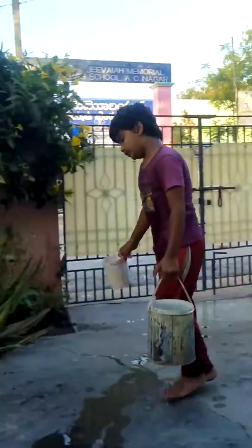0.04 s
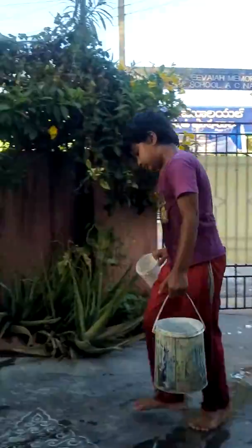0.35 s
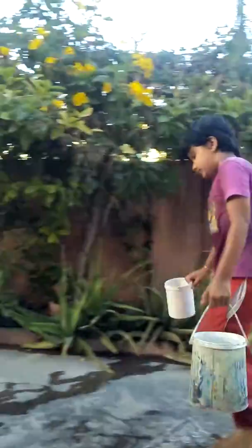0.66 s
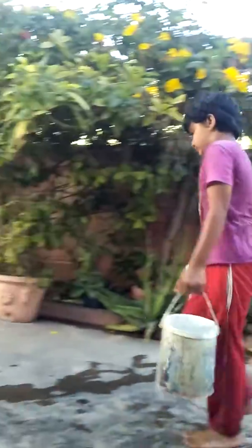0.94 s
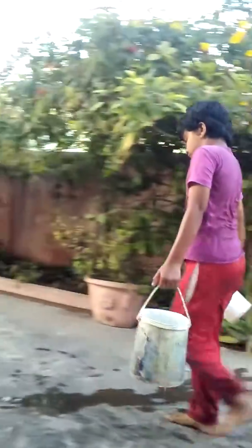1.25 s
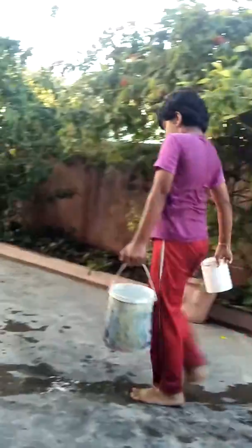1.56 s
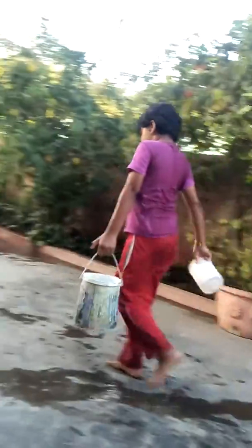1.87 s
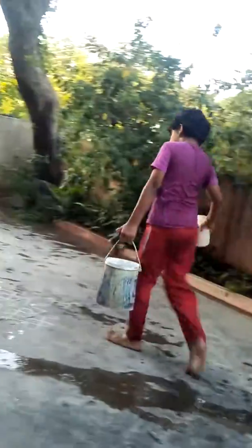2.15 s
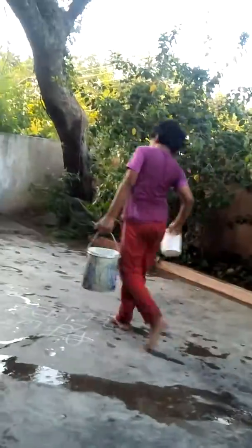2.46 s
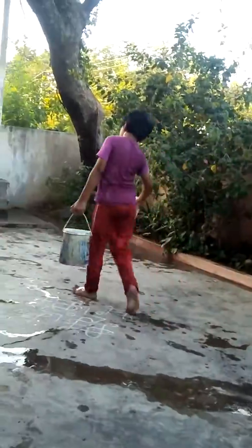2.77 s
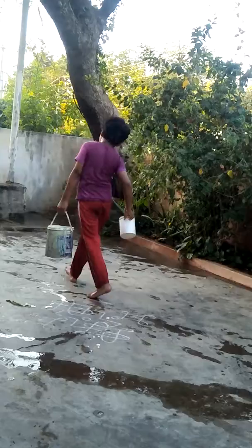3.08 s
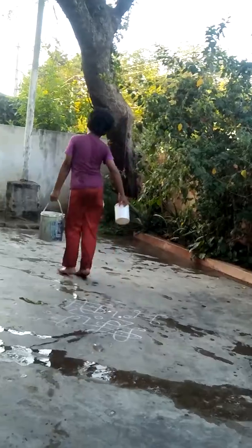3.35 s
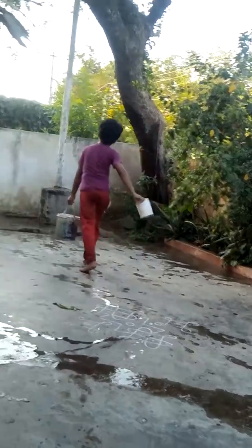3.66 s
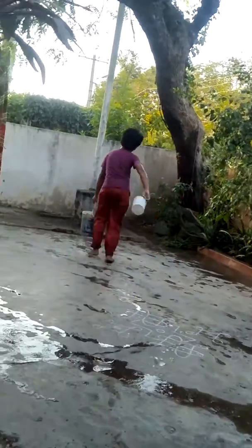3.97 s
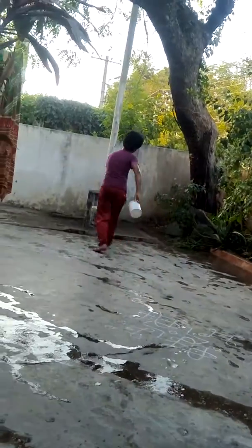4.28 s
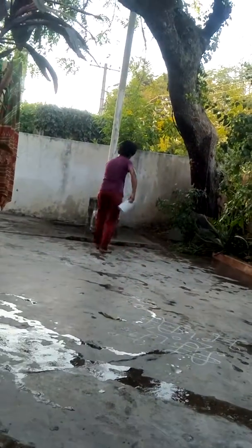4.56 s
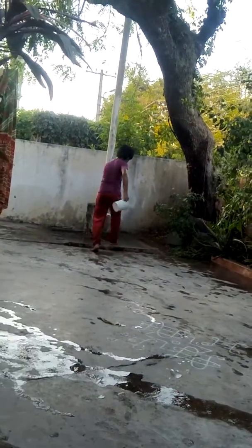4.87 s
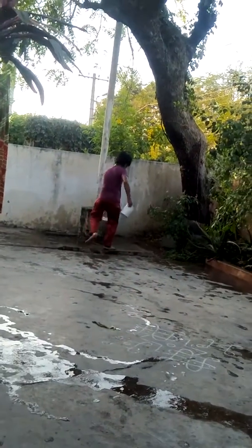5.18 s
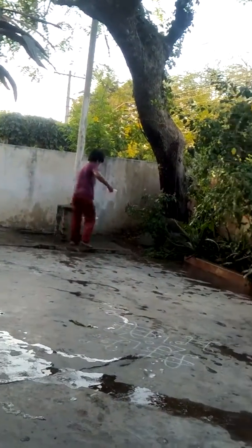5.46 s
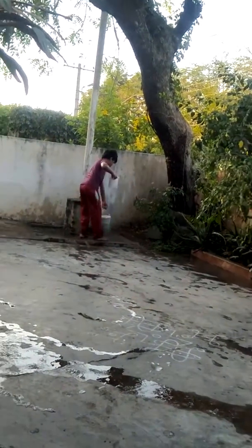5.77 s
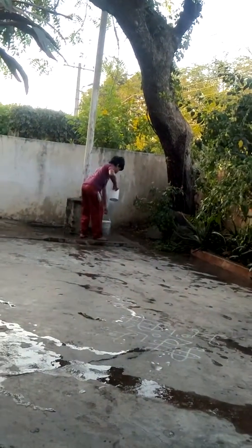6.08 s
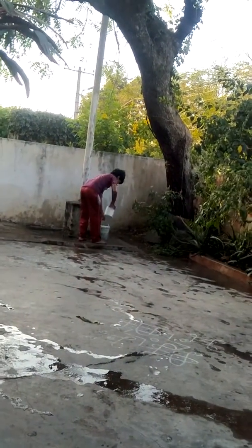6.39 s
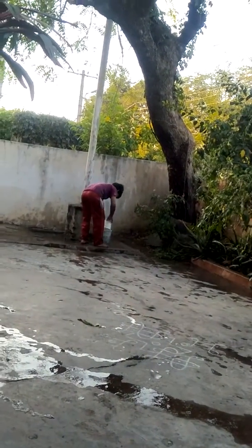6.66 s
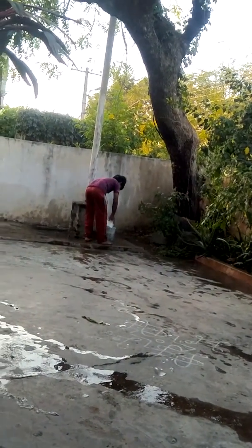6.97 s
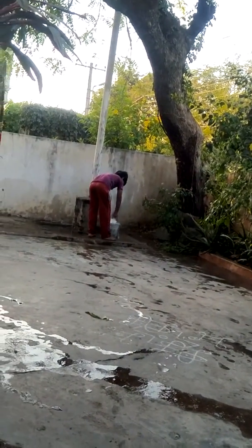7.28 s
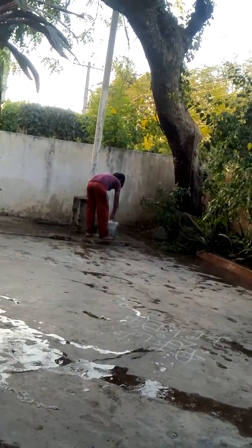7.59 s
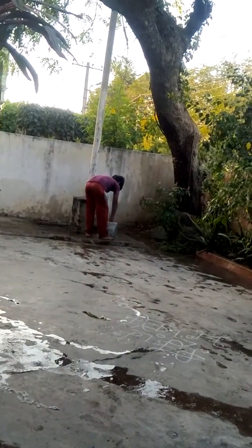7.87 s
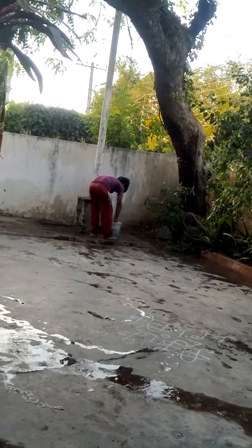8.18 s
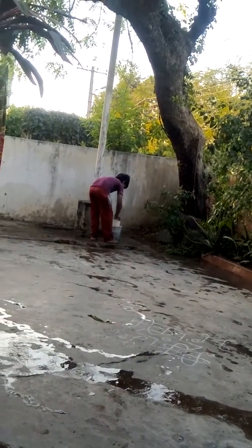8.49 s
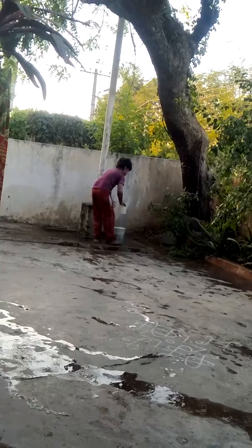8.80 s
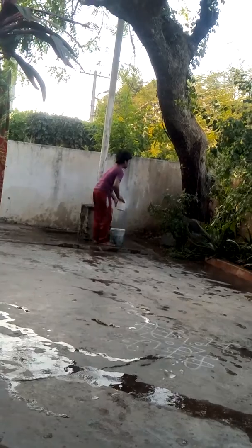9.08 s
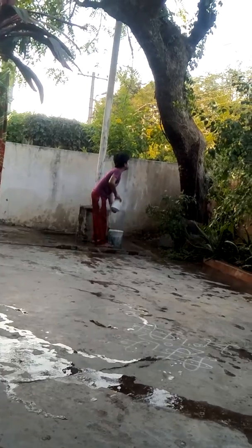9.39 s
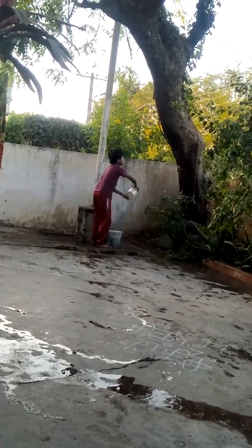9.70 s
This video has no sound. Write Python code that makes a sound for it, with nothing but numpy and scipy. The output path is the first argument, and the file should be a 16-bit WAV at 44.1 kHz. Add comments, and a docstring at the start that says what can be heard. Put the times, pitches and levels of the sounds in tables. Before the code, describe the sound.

From the start, water laps and sloshes softly in a carried metal bucket while bare feet pad evenly and scuff on gritty concrete until about 5 seconds. Around 2 seconds a small metal ring, perhaps a bangle, clinks sharply several times close by, and the bucket hums faintly. From about 3.7 seconds, clusters of short high chirps from distant birds or insects continue to the end. Between 4 and 5.5 seconds the water plops and swirls, with hollow gulps and light knocks. At about 6.3 seconds the bucket lands with a short rattly knock. A mug scoops the water, splashing around 7.6 seconds, followed by ticking drips and rising, gurgling plops, loudest from 8.2 to 9 seconds and continuing until nearly 10. The bucket sounds some way off, with short echoes from the walled yard, over faint hiss and low rumble.

```python
"""A walled concrete yard: a child carries a metal bucket of water, sets it down and scoops with a mug.
Trapped bubbles ring as the water laps, plops and splashes; the air above it gulps and resonates.
The bucket knocks and its wall hums, with short echoes off the yard. Bare feet pad and scuff.
Early on, a metal ring, perhaps a bangle, clinks a few times close by.
Clusters of short, high chirps, probably distant birds or insects, sound over faint hiss and rumble."""
import sys
import numpy as np
from scipy import signal
from scipy.fft import rfft, irfft
from scipy.io import wavfile

SR = 44100
rng = np.random.default_rng(int(sys.argv[2]) if len(sys.argv) > 2 else 0)


def store_wav(level_fs):
    """Save 16-bit WAV to argv[1]."""
    pcm = np.round(np.clip(np.atleast_2d(level_fs), -1, 1) * 32767)
    wavfile.write(sys.argv[1], SR, pcm.T.astype(np.int16))


N = 429534
FAR_GAIN_DB = -3

# time_s, large_bubbles_db, small_bubbles_db
WATER_LEVELS = [(0, -68.5, -65), (1.05, -72, -65.5), (1.55, -70.5, -75), (1.85, -83.5, -76.5),
                (3.0, -70.5, -76), (3.45, -73.5, -65), (4.1, -65, -68.5), (4.5, -58.5, -68),
                (4.75, -51, -54.5), (4.95, -59.5, -59.5), (5.4, -61, -76.5), (5.9, -72, -74),
                (6.6, -63, -68.5), (7.42, -71.5, -64.5), (7.65, -64.5, -60.5), (8.1, -65, -67),
                (8.38, -54.5, -56), (8.65, -63, -69), (9.74, -63, -65)]
# freq_hz, gain_db
PATTER_SPECTRUM = [(1000, -38), (2900, -20.5), (3400, -5), (3900, -38), (4400, 8.5), (4750, 4.5),
                   (5150, -19.5), (5800, -17.5), (6300, -25), (7050, -20), (8000, -28.5), (13000, -27.5)]


def lapping():
    """Water surges against the wall, trapping bubbles; fine drops patter on the metal."""
    large_db, small_db = [db + 2.5 * drift(rate_hz=6.3) for db in in_time(WATER_LEVELS)]
    fine_db = np.minimum(small_db - 3, -67)
    pings = cavity(ring_cloud(3300, 6200, per_s=280, t60_s=.032, spread_db=12))
    patter = from_db(-13.5) * colour(unit_rms(grains(per_s=50, spread_db=5)), PATTER_SPECTRUM)
    large = froth(379.6, 1399.5, per_s=60, t60_s=.05, spread_db=19, wash_db=-8.5)
    small = froth(1399.7, 3300, per_s=80, t60_s=.07, spread_db=16, wash_db=-9.5)
    return from_db(large_db) * large + from_db(small_db) * small + from_db(fine_db) * (pings + patter)


def froth(low_hz, high_hz, per_s, t60_s, spread_db, wash_db):
    """One size range of bubbles over a soft wash, coloured by the bucket."""
    wash = unit_rms(butterworth(rng.standard_normal(N), 4, [low_hz, high_hz], "band"))
    return cavity(ring_cloud(low_hz, high_hz, per_s, t60_s, spread_db) + from_db(wash_db) * wash)


# freq_hz, width_hz, gain_db
CAVITY_MODES = [(548.4, 160, -8.5), (830, 130, -4), (1200, 140, 0), (1297, 84, 3), (1650, 530, -0.5),
                (2287, 220, 6), (2880, 290, 0.5), (3380, 143, 4), (4519, 190, 7), (5820, 150, -9.5)]


def cavity(x):
    """The bucket's cavity as parallel resonators; rms 1."""
    out = 0
    for k, (hz, width_hz, db) in enumerate(CAVITY_MODES):
        r = np.exp(-np.pi * width_hz / SR)
        feedback = [1, -2 * r * np.cos(2 * np.pi * hz / SR), r * r]
        out += (-1) ** k * from_db(db) * signal.lfilter([1 - r, 0, r - 1], feedback, x)
    return unit_rms(out)


def stray_plops(t60_s=.065, glide_ratio=.23):
    """Rows of random lesser plops, pitched near cavity modes, as strong as the water rocks."""
    large_db, small_db = in_time(WATER_LEVELS)
    rows, per_s = [], 11
    for when, which, detune, weakness in rng.random((int(per_s * N / SR), 4)):
        mode_hz = CAVITY_MODES[int(which * (len(CAVITY_MODES) - 2))][0]
        hz = mode_hz * (1 + .092 * (2 * detune - 1))
        water_db = (large_db if hz < 1400 else small_db)[int(when * N)]
        rows.append((when * N / SR, hz, water_db + 12 - 5 * weakness, t60_s, glide_ratio))
    return rows


# start_s, pitch_hz, level_db, t60_s, glide_ratio
PLOPS = [(1.325, 1310, -50, 0.04, .1), (1.6, 830, -44, 0.067, 0.35), (3.343, 1620, -40, 0.083, 0.12),
         (3.826, 1185, -30.5, 0.064, 0.33), (4.06, 640, -41, 0.11, 0.44), (4.453, 1165, -32.5, 0.038, .3),
         (4.557, 1116, -28, .035, 0.36), (5.602, 1148, -29.5, 0.039, 0.94), (6.641, 519, -38, 0.05, 0.19),
         (6.96, 730, -40.5, 0.11, .3), (7.015, 792, -41.5, 0.063, 0.25), (7.085, 1145, -33, 0.1, 0.44),
         (7.098, 1564, -36, 0.083, 0.32), (7.21, 496, -37.5, 0.056, .1), (7.79, 3350, -33, 0.045, .1),
         (7.881, 3376, -32, 0.041, 0.085), (7.905, 534, -33.5, 0.057, 0.28),
         (8.007, 512, -33.5, 0.046, 0.58), (8.222, 1956, -28.5, 0.066, 0.22),
         (8.232, 1674, -27, 0.083, 0.081), (8.29, 1703, -33.5, 0.11, .03), (8.333, 540, -31, 0.066, 0.42),
         (8.384, 1283, -29, 0.042, .1), (8.42, 1690, -37, 0.11, 0.028), (8.46, 544, -36, 0.073, 0.21),
         (8.568, 1276, -38, 0.092, .05), (8.636, 626, -17.5, 0.066, 0.81), (8.661, 626, -23.5, 0.039, 0.34),
         (8.706, 521, -31.5, 0.074, 0.34), (8.778, 586, -25, 0.11, 0.79), (8.794, 768, -25, .06, .5),
         (8.786, 2294, -34, 0.047, 0.091), (8.878, 3360, -38.5, 0.085, .02),
         (8.922, 844, -20.5, 0.075, 0.19), (8.953, 828, -26.5, 0.052, 0.27), (8.998, 832, -27, 0.077, 0.13),
         (9.015, 1270, -37, 0.095, .05), (9.088, 1685, -39.5, 0.14, 0.049),
         (9.122, 1296, -33, 0.087, 0.046), (9.214, 1711, -33.5, 0.12, .03), (9.217, 3380, -44, 0.092, .02),
         (9.385, 824, -35.5, 0.095, 0.14), (9.425, 1780, -27, 0.044, 0.23), (9.505, 1274, -29, 0.051, 0.26),
         (9.566, 1280, -26, 0.033, .3), (9.564, 1850, -32.5, 0.062, 0.18), (9.655, 3380, -38, .08, .04)]


def plops():
    """Big bubbles glide upwards; bucket and yard echoes smear each into a gurgle."""
    out = np.zeros(N)
    for start_s, hz, db, t60_s, glide_ratio in PLOPS + stray_plops():
        plop = from_db(db) * bubble(hz, t60_s, glide_ratio, onset_s=.12 * t60_s)
        echo = with_energy(yard_echo(plop, delay_s=.01414, t60_s=.33), np.sum(plop ** 2))
        add(out, start_s, plop)
        add(out, start_s, from_db(-2.5) * echo)
    return from_db(FAR_GAIN_DB) * out * (1 + .38 * drift(rate_hz=50))


def bubble(hz, t60_s, glide_ratio, onset_s):
    """An air pocket swells, rings and rises in pitch as it nears the surface."""
    t = np.arange(int(t60_s * SR)) / SR
    pitch_hz = hz * (1 + glide_ratio * (t / t60_s - .2))
    envelope = from_db(-60 * t / t60_s) * (1 - np.exp(-(t / onset_s) ** 2))
    return envelope * np.sin(2 * np.pi * np.cumsum(pitch_hz) / SR)


# peak_s, level_db, spread_s, pitch_hz
SLOSHES = [(.04, -46, .015, 2127), (.07, -50, 0.036, 2746), (.27, -59.5, 0.024, 2705),
           (.38, -63.5, 0.0067, 6500), (.46, -60.5, 0.036, 2910), (.545, -65, 0.009, 1900),
           (.63, -59, 0.015, 3120), (.745, -53.5, 0.012, 2146), (.87, -61.5, 0.011, 2590),
           (1.0, -54.5, 0.019, 2656), (1.053, -47.5, .005, 2007), (1.079, -61.5, 0.011, 4700),
           (1.5, -70, 0.028, 1055), (2.53, -62.5, .018, 3930), (2.575, -64.5, 0.011, 3940),
           (2.785, -55.5, .01, 2074), (2.855, -51.5, .013, 3980), (3.955, -55, 0.012, 2690),
           (4.30, -55, 0.028, 2013), (4.31, -60.5, 0.015, 2880), (4.465, -51.5, .008, 3150),
           (4.84, -54, 0.021, 3690), (5.06, -52.5, .022, 1890), (5.07, -55, 0.019, 2735),
           (5.16, -67, 0.013, 5750), (5.305, -54, 0.0065, 2900), (6.09, -59, 0.01, 3190),
           (6.275, -51, 0.018, 2825), (6.66, -59, 0.012, 2835), (6.72, -61.5, 0.024, 1806),
           (7.2, -57, 0.016, 2210), (7.595, -45, 0.014, 2180), (7.65, -38.5, .014, 2062),
           (7.705, -48, 0.02, 2110), (7.807, -45.5, 0.0091, 1976), (7.915, -52, .02, 2216),
           (8.13, -52, .018, 1926), (8.211, -44, 0.004, 2125), (8.234, -35.5, 0.004, 2060),
           (8.33, -51.5, 0.019, 1794), (8.405, -47.5, 0.026, 1943), (8.64, -51, .01, 1790),
           (8.645, -51.5, 0.017, 1086), (8.912, -50, .009, 2136), (9.105, -55, 0.0083, 2630),
           (9.43, -49.5, 0.008, 1770), (9.67, -58, .025, 3090)]


def sloshes():
    """Wavelets fold over, each trapping a cluster of bubbles."""
    out = np.zeros(N)
    for peak_s, db, spread_s, hz in SLOSHES:
        start_s = peak_s - 3 * spread_s
        skip = int(max(-start_s, 0) * SR)
        add(out, start_s, from_db(db) * bubble_cluster(hz, spread_s)[skip:])
    return out


def bubble_cluster(hz, spread_s, count=18, t60_s=.05, spread_octaves=.0962):
    """Like-sized bubbles bunched around 3 * spread_s; rms near 1 at the peak."""
    out = np.zeros(int((6 * spread_s + t60_s) * SR) + 2)
    for when, detune, strength in np.clip(rng.standard_normal((count, 3)), -2.5, 2.5):
        ring = bubble(hz * 2 ** (spread_octaves * detune), t60_s, glide_ratio=.054, onset_s=.0027)
        i = int((when + 3) * spread_s * SR)
        out[i:i + len(ring)] += from_db(3.6 * strength) * ring
    return with_energy(out, np.sqrt(2 * np.pi) * spread_s * SR)


# one curve per resonance: time_s, pitch_hz, level_db
SWIRL_CURVES = [
    [(4.54, 1200, -100), (4.57, 1222, -56.5), (4.72, 1038, -53), (4.79, 1106, -45), (4.92, 1053, -46.5),
     (5.0, 1000, -49.5), (5.07, 1006, -46.5), (5.14, 1074, -53), (5.32, 1076, -55), (5.4, 1130, -65),
     (5.5, 1190, -100)],
    [(4.5, 1600, -100), (4.58, 1598, -56), (4.68, 1510, -53), (4.73, 1610, -64), (4.78, 1680, -50.5),
     (4.89, 1613, -55), (5.0, 1510, -63), (5.15, 1500, -100)],
    [(4.5, 2150, -100), (4.64, 2250, -51.5), (4.78, 2220, -49), (4.92, 2150, -48.5), (5.0, 2270, -59.5),
     (5.08, 2332, -53), (5.22, 2250, -66.5), (5.45, 2230, -100)],
]


def swirl():
    """Circling water reshapes the air space, so its resonances glide."""
    out = np.zeros(N)
    for curve in SWIRL_CURVES:
        hz, db = in_time(curve)
        out += from_db(db) * wavering_tone(hz, wander=.022, roughness=.75, rate_hz=75)
    return out


# peak_s, level_db, rise_s
SPLASHES = [(.045, -53, 0.036), (7.502, -53, 0.0024), (7.57, -44.5, 0.0072), (7.65, -45, 0.066),
            (7.72, -48, .01), (7.80, -51, 0.0039), (8.229, -53, 0.018), (8.40, -54.5, .038)]
# freq_hz, gain_db
SPLASH_SPECTRUM = [(300, -22), (900, -18), (1300, -1), (1800, -30), (2200, 4), (2800, -5.5), (3400, -1.5),
                   (4600, -8.5), (6000, -11.5), (9000, -17.5), (13000, -20), (15000, -28)]


def splashes(t60_s=.28):
    """The surface breaks: dense bubbles in a wash of fine drops."""
    bubbles = ring_cloud(400, 4000, per_s=900, t60_s=.035, spread_db=11)
    wash = unit_rms(grains(per_s=9000, spread_db=1.5))
    envelope = swells([(s, db, rise_s, t60_s) for s, db, rise_s in SPLASHES])
    return envelope * unit_rms(colour(bubbles + wash, SPLASH_SPECTRUM))


# peak_s, level_db, rise_s
SPRAYS = [(.189, -63, 0.03), (3.30, -58, 0.048), (7.60, -57.5, .025), (8.02, -69.5, .03),
          (9.47, -69.5, 0.026)]
# freq_hz, gain_db
SPRAY_SPECTRUM = [(4000, -25), (6500, -3), (9000, -6), (11500, 0), (12800, 7), (13600, -1), (14500, -13)]


def spray(t60_s=.33):
    """Thrown water ends in fine droplets."""
    droplets = unit_rms(colour(grains(per_s=5000, spread_db=8), SPRAY_SPECTRUM))
    return swells([(s, db, rise_s, t60_s) for s, db, rise_s in SPRAYS]) * droplets


# start_s, level_db, pitch_hz
DROPS = [(4.215, -56, 8300), (4.7572, -56, 8240), (5.751, -63, 7150), (5.989, -62, 7310),
         (6.6869, -57, 13100), (7.3079, -58, 13100), (7.5225, -60, 12600), (7.5634, -54, 12800),
         (7.958, -55, 12800), (8.1894, -61, 8520), (8.5701, -61, 8410), (9.1263, -59, 12800),
         (9.5349, -60.5, 10000)]


def drops(t60_s=.025):
    """Lone drops smack the metal with a crisp tick."""
    out = np.zeros(N)
    t = np.arange(int(t60_s * SR)) / SR
    for start_s, db, hz in DROPS:
        crack = from_db(-4.5) * noise_band(10000, width_hz=8000, samples=len(t))
        ping = noise_band(hz, width_hz=840, samples=len(t))
        add(out, start_s, from_db(db - 60 * t / t60_s) * (ping + crack))
    return out


# peak_s, level_db
GULPS = [(.022, -54.5), (.12, -52.5), (1.331, -56.5), (1.87, -61.5), (3.74, -52.5), (4.065, -51.5),
         (4.21, -54), (4.615, -51.5), (4.76, -53.5), (7.514, -56), (7.566, -43), (9.604, -54)]


def gulps(pitch_hz=283, rise_s=.0089, t60_s=.1803):
    """Heaving water thumps the air above it: a short, hollow note."""
    envelope = swells([(s, db, rise_s, t60_s) for s, db in GULPS])
    return envelope * wavering_tone(pitch_hz, wander=.08, roughness=.37, rate_hz=43)


# peak_s, level_db, rise_s, t60_s, rasp_relative_db
KNOCKS = [(2.775, -50.5, .003, 0.11, -9), (3.134, -55.5, .002, 0.094, -17), (4.562, -48, .003, 0.27, -26),
          (4.76, -44, 0.022, .17, -32), (5.606, -47.5, 0.0014, 0.067, -27), (6.301, -34, 0.0018, .1, -12),
          (6.375, -40, 0.0055, 0.17, -11.5)]
# freq_hz, gain_db
KNOCK_SPECTRUM = [(200, -29), (350, -6), (460, -0.5), (580, -2.5), (730, 1), (950, -19), (1180, -7),
                  (1360, -24.5), (1580, -4), (1820, -2.5), (2080, -8.5), (2250, -15), (3000, -18.5),
                  (5000, -36), (9000, -57)]
RASP_SPECTRUM = [(1500, -23), (3000, -0.5), (5000, -1), (8000, -16.5), (13000, -11.5), (16000, -23)]


def bucket_knocks():
    """Water damps the bucket, so knocks are short and rattly; grit rasps under the rim."""
    hits = KNOCKS + landing()
    rattle = swells([hit[:4] for hit in hits]) * unit_rms(grains(per_s=5993, spread_db=3))
    rasp_envelope = swells([(s, db + rasp_db, rise_s, t60_s) for s, db, rise_s, t60_s, rasp_db in hits])
    return colour(rattle, KNOCK_SPECTRUM) + colour(rasp_envelope * rng.standard_normal(N), RASP_SPECTRUM)


def landing(rise_s=.0032, t60_s=.064, rasp_db=-15):
    """Knock rows: the bucket lands and rocks on its rim."""
    contacts = repeats(start_s=6.31, db=-28, gap_s=.0204, loss_db=2.5, count=3)
    return [(s, db, rise_s, t60_s, rasp_db) for s, db in contacts]


# peak_s, level_db
WALL_NUDGES = [(2.199, -59), (2.376, -62), (2.426, -58)]


def wall_hum(pitch_hz=1130, rise_s=.0078, t60_s=.48):
    """Nudged as it swings, the bucket's wall rings on in one note."""
    envelope = swells([(s, db, rise_s, t60_s) for s, db in WALL_NUDGES])
    return envelope * wavering_tone(pitch_hz, wander=.0176, roughness=.63, rate_hz=54)


# start_s, tick_db, ring_db
CLINKS = [(1.9609, -5.5, -43), (1.9628, -10, -38), (1.9665, -46, -30.5), (1.9729, -8.5, -39),
          (1.974, -9, -27), (1.9808, -50, -39), (1.9916, -52, -27.5), (2.1617, -17.5, -33.5),
          (2.1874, -51, -32), (2.1954, -10, -33), (2.249, -65, -46), (2.3208, -26.5, -44),
          (2.341, -53, -55), (2.363, -54, -50.5), (2.382, -37.5, -52.5), (2.4173, -35, -52)]
# freq_hz, gain_db
TICK_SPECTRUM = [(200, -56), (2500, -44), (3000, -19), (3800, -20.5), (4700, -14), (5600, -20.5),
                 (6800, -14), (7700, -20), (9100, -1.5), (9900, -14), (10400, -5), (11300, 1.5),
                 (12100, -5), (12700, 1), (13400, -3.5), (14100, -17.5), (15000, -17), (16000, -27)]
CRACK_SPECTRUM = [(100, -2.5), (3000, -8), (6000, -1), (9000, -3), (16000, -7.5)]


def ring_clinks(rise_s=.00008, tick_t60_s=.0041, chatter_t60_s=.036, crack_t60_s=.0032):
    """Hard metal contacts tick, chatter and ring; the first also cracks across the whole range."""
    ticks = [(s, db, rise_s, tick_t60_s) for s, db, _ in CLINKS]
    chatter = [(s, db - 28, rise_s, chatter_t60_s) for s, db, _ in CLINKS]
    contacts = colour(swells(ticks + chatter) * rng.choice([-1, 1], N), TICK_SPECTRUM)
    crack_envelope = swells([(CLINKS[0][0], -10.5, rise_s, crack_t60_s)])
    crack = colour(crack_envelope * rng.choice([-1, 1], N), CRACK_SPECTRUM)
    ringing = ring_modes([(s, db) for s, _, db in CLINKS])
    direct = contacts + crack + butterworth(ringing, 6, 1400, "high")  # a small body radiates no bass
    dulled = butterworth(direct, 1, 3500, "low")
    return direct + from_db(-11.5) * yard_echo(dulled, delay_s=.012, t60_s=.5)


# freq_hz, gain_db, t60_s
RING_MODES = [(1592, -21.5, 0.17), (2890, -2, .06), (2930, -3, .04), (3170, -11, 0.053), (4520, -10, 0.055),
              (4593, -6, 0.08), (4740, -6.5, 0.041), (4748, -27, 0.4), (6590, -12.5, .09), (6900, -15, .04),
              (8600, -11, .05), (9070, -14, .04), (11020, -14, .05), (12640, -18, 0.05), (13200, -18, .04)]


def ring_modes(hits, vary_db=2.5, onset_width_hz=450):
    """Each hit (start_s, level_db) excites the ring's bending modes unevenly; they buzz as it rattles."""
    start_s, db = np.transpose(hits)
    scatter_db = vary_db * rng.standard_normal((len(hits), len(RING_MODES)))
    out = np.zeros(N)
    for k, (hz, mode_db, t60_s) in enumerate(RING_MODES):
        impulses = np.full(N, 1e-18)
        impulses[(start_s * SR).astype(int)] = from_db(db + mode_db + scatter_db[:, k])
        r, w = from_db(-60 / (t60_s * SR)), 2 * np.pi * hz / SR
        note = signal.lfilter([0, np.sin(w)], [1, -2 * r * np.cos(w), r * r], impulses)
        softened = signal.lfilter(*signal.iirpeak(hz, hz / onset_width_hz, fs=SR), note)
        out += softened * (1 + .45 * drift(rate_hz=130))
    return out


# level_db per step
STEP_LEVELS = [-56, -54, -53.5, -54.5, -45, -52, -46]
# peak_s, level_db
BUMPS = [(.22, -60), (2.445, -58), (2.844, -53.5), (4.755, -42), (4.08, -54.5), (5.565, -56.5),
         (6.323, -41.5), (6.408, -45.5), (8.80, -46), (8.92, -54)]
# freq_hz, gain_db
THUD_SPECTRUM = [(25, -16), (55, 0.5), (95, 2), (150, -2), (220, -12), (400, -33), (900, -59)]


def footfalls(first_s=.575, step_s=.653, rise_s=.0036, step_t60_s=.72, bump_t60_s=.46):
    """Bare feet pad at an even pace, among other soft bumps."""
    steps = [(first_s + k * step_s, db, rise_s, step_t60_s) for k, db in enumerate(STEP_LEVELS)]
    bumps = [(s, db, rise_s, bump_t60_s) for s, db in BUMPS]
    return colour(swells(steps + bumps) * rng.standard_normal(N), THUD_SPECTRUM)


# peak_s, level_db, rise_s
SCUFFS = [(.04, -55, 0.016), (.27, -73, .02), (0.43, -49.5, 0.0045), (.495, -56, 0.005), (.62, -69, 0.011),
          (1.07, -72, 0.0046), (1.48, -64.5, 0.01), (1.64, -63, 0.013), (2.515, -59.5, 0.0071),
          (2.855, -68, 0.027), (3.045, -62, 0.0038), (3.14, -54, 0.007), (3.22, -53.5, 0.017),
          (3.308, -45, 0.044), (4.365, -56, 0.0031), (4.85, -59, 0.021), (8.04, -58, 0.051)]
# freq_hz, gain_db
SCUFF_SPECTRUM = [(800, -17), (2500, -29), (3150, 14.5), (3800, 2.5), (4700, 8.5), (5600, -5.5),
                  (8000, -17.5), (11500, -13), (13400, -13), (14500, -23)]


def scuffs(t60_s=.28):
    """Grit catches underfoot and rings briefly."""
    pings = ring_cloud(2000, 14000, per_s=1500, t60_s=.04, spread_db=6)
    grit = unit_rms(grains(per_s=9000, spread_db=1.5))
    envelope = swells([(s, db, rise_s, t60_s) for s, db, rise_s in SCUFFS])
    return envelope * unit_rms(colour(pings + grit, SCUFF_SPECTRUM))


# peak_s, level_db
CHIRPS = [(3.734, -46), (3.9061, -51), (3.983, -53.5), (4.0603, -49), (4.1336, -49.5), (4.3634, -54),
          (4.427, -56), (4.5736, -56), (4.6729, -57), (4.8086, -52), (4.8974, -54), (4.9862, -53),
          (5.0391, -55), (5.115, -52), (5.2226, -53), (5.507, -55), (5.5544, -57.5), (5.6307, -46),
          (5.6911, -47.5), (5.7494, -48.5), (5.901, -48), (5.9395, -51), (5.99, -48.5), (6.0258, -51),
          (6.2009, -61), (6.2703, -50), (6.596, -45.5), (6.716, -40.5), (6.8355, -48), (7.065, -55),
          (7.1005, -47.5), (7.2605, -43.5), (7.2884, -48.5), (7.4561, -60), (7.4975, -46), (7.5623, -45),
          (7.6567, -37), (7.8162, -51), (7.8986, -51), (7.962, -42), (8.1061, -46.5), (8.159, -50.5),
          (8.1899, -47.5), (8.3416, -44.5), (8.3889, -43), (8.5411, -57), (8.5885, -52), (8.6404, -50.5),
          (8.7656, -53), (8.9498, -47), (9.0524, -54), (9.1782, -57), (9.6017, -50.5), (9.6516, -48)]
# freq_hz, width_hz, gain_db, t60_s
CHIRP_BANDS = [(3416, 190, -18, 0.087), (4445, 142, -6, .11), (4740, 264, -6.5, 0.056),
               (5750, 260, -21, 0.069), (7080, 400, -28.5, .06)]


def chirps(faint_from_s=3.85, faint_per_s=16, rise_s=.00094):
    """Short, high chirps near 4.5 kHz in clusters, probably distant birds or insects."""
    span_s = N / SR - faint_from_s
    faint = rng.random((int(faint_per_s * span_s), 2))
    pulses = [(faint_from_s + when * span_s, -54.5 - 11 * weakness) for when, weakness in faint]
    for s, db in CHIRPS:
        pulses += repeats(s, db, gap_s=.0265 * rng.uniform(.4, 1.63), loss_db=9, count=2)
    out = np.zeros(N)
    for hz, width_hz, band_db, t60_s in CHIRP_BANDS:
        gains_db = band_db + 3 * np.clip(rng.standard_normal(len(pulses)), -2, 1)
        bursts = [(s, db + gain_db, rise_s, t60_s) for (s, db), gain_db in zip(pulses, gains_db)]
        out += swells(bursts) * noise_band(hz, width_hz, samples=N)
    return out


def yard_echo(x, delay_s, t60_s):
    """Scattered echoes from ground, wall and bushes."""
    t = np.arange(int(t60_s * SR)) / SR
    reflections = rng.standard_normal(len(t)) * (rng.random(len(t)) < .1)
    response = reflections * from_db(-60 * t / t60_s) * (t > delay_s)
    return signal.fftconvolve(x, with_energy(response, 1))[:N]


# time_s, level_db
AIR_LEVELS = [(0, -69.5), (1.85, -77.5), (2.9, -77), (3.5, -72), (4.5, -71.5), (4.8, -67.5), (6.2, -72),
              (8.9, -70), (9.74, -71)]
# freq_hz, gain_db
RUMBLE_SPECTRUM = [(20, -11.5), (50, 2), (100, 2), (140, -3.5), (210, -5.5), (285, -3), (380, -10),
                   (800, -18.5), (2000, -19.5), (4000, -31.5)]
HISS_SPECTRUM = [(500, 2.5), (3000, 2.5), (5000, -5), (7000, -2.5), (10000, -3), (12500, -2), (14000, 3),
                 (16000, -5)]


def background():
    """Distant rumble and an even hiss rise and sink together."""
    level_db, = in_time(AIR_LEVELS)
    rumble = from_db(5.5) * colour(rng.standard_normal(N), RUMBLE_SPECTRUM)
    hiss = colour(rng.standard_normal(N), HISS_SPECTRUM)
    return from_db(level_db) * (rumble + hiss)


def from_db(db):
    """Decibels to gain."""
    return 10 ** (np.asarray(db) / 20)


def unit_rms(x):
    """Scale to rms 1."""
    return x / np.sqrt(np.mean(x ** 2) + 1e-20)


def with_energy(x, energy):
    """Scale to a given sum of squares."""
    return x * np.sqrt(energy / (np.sum(x ** 2) + 1e-20))


def in_time(rows):
    """Interpolate each column after time_s to every sample."""
    time_s, *columns = np.transpose(rows)
    return [np.interp(np.arange(N) / SR, time_s, column) for column in columns]


def add(out, start_s, sound):
    """Mix a sound in at start_s."""
    i = int(np.clip(round(start_s * SR), 0, N - 1))
    out[i:i + len(sound)] += sound[:N - i]


def butterworth(x, order, cutoff_hz, kind):
    """Causal Butterworth filter."""
    return signal.sosfilt(signal.butter(order, cutoff_hz, kind, fs=SR, output="sos"), x)


def colour(x, spectrum, size=8192):
    """Minimum-phase filter from (freq_hz, gain_db) rows; keeps the power of white noise."""
    hz, db = np.transpose(spectrum)
    bins_hz = np.maximum(np.arange(size // 2 + 1) * SR / size, 1)
    gain = from_db(np.interp(np.log(bins_hz), np.log(hz), db))
    gain = unit_rms(gain * np.minimum(bins_hz / 20, 1))
    cepstrum = irfft(np.log(gain))
    causal_fold = np.r_[1, np.full(size // 2 - 1, 2), 1, np.zeros(size // 2 - 1)]
    response = irfft(np.exp(rfft(cepstrum * causal_fold)))
    return signal.oaconvolve(x, response)[:N]


def drift(rate_hz, hop=20):
    """Smooth random motion; rms 1."""
    r = np.exp(-2 * np.pi * hop * rate_hz / SR)
    slow = signal.lfilter([1], [1, -2 * r, r * r], rng.standard_normal(N // hop + 4002))[4000:]
    return np.interp(np.arange(N) / hop, np.arange(len(slow)), unit_rms(slow))


def swells(rows):
    """Envelope of bursts (peak_s, level_db, rise_s, t60_s), summed in power."""
    power = np.zeros(N)
    for peak_s, db, rise_s, t60_s in rows:
        start_s = max(peak_s - 3 * rise_s, 0)
        t = np.arange(int((peak_s - start_s + t60_s) * SR)) / SR + start_s - peak_s
        attack = np.exp(-.5 * (np.minimum(t, 0) / rise_s) ** 2)
        decay = from_db(db - 60 * np.maximum(t, 0) / t60_s)
        add(power, start_s, (attack * decay) ** 2)
    return np.sqrt(power)


def repeats(start_s, db, gap_s, loss_db, count):
    """An event and its weakening repeats as (time_s, level_db) rows."""
    return [(start_s + k * gap_s, db - k * loss_db) for k in range(count)]


def grains(per_s, spread_db):
    """Random clicks of uneven size."""
    clicks = (rng.random(N) < per_s / SR) * rng.choice([-1, 1], N)
    return clicks * from_db(spread_db * np.minimum(rng.exponential(1, N), 4))


def ring_cloud(low_hz, high_hz, per_s, t60_s, spread_db):
    """Short rings at random times, pitches and strengths; rms 1."""
    out = np.zeros(N)
    for when, height, strength in rng.random((int(per_s * N / SR), 3)):
        ring = bubble(low_hz * (high_hz / low_hz) ** height, t60_s, glide_ratio=.003, onset_s=.008)
        add(out, when * N / SR, from_db(spread_db * strength) * ring)
    return unit_rms(out)


def wavering_tone(hz, wander, roughness, rate_hz):
    """A sine of unsteady pitch and strength; rms 1."""
    pitch_hz = hz * (1 + wander * drift(rate_hz))
    tone = np.sin(2 * np.pi * np.cumsum(pitch_hz) / SR)
    return unit_rms(tone * (1 + roughness * drift(rate_hz)))


def noise_band(hz, width_hz, samples):
    """Noise in one resonance; rms 1."""
    edges_hz = [hz - width_hz / 2, hz + width_hz / 2]
    return unit_rms(butterworth(rng.standard_normal(samples), 2, edges_hz, "band"))


def scene():
    """Bucket and chirps are some way off and echo; the ring is close and nearly dry."""
    water = lapping() + sloshes() + swirl() + splashes() + spray() + drops()
    direct = water + bucket_knocks() + chirps()
    echo = from_db(-7.5) * yard_echo(direct, delay_s=.003, t60_s=.25)
    far = from_db(FAR_GAIN_DB) * direct + echo + plops() + gulps() + wall_hum()
    return (far + ring_clinks() + footfalls() + scuffs() + background())[None]


def record(dry):
    """Soft clip, then a steep 16 kHz low-pass."""
    rounded = .85 * np.tanh(dry / .85)
    return signal.sosfilt(signal.ellip(10, .2, 80, 16000, fs=SR, output="sos"), rounded)


dry = scene()
out = record(dry)
store_wav(out)
```